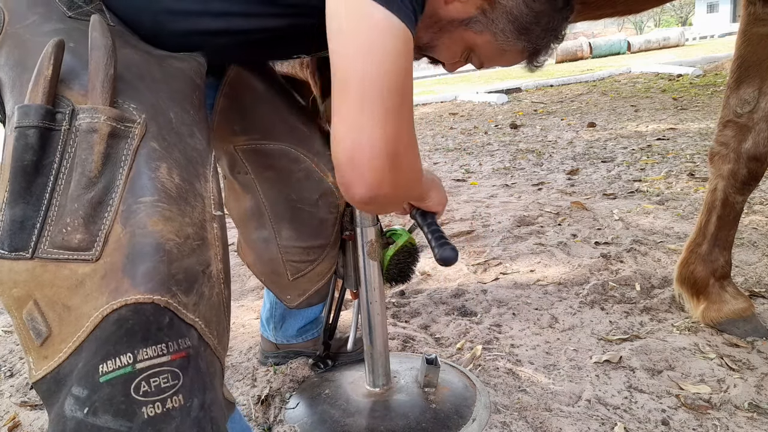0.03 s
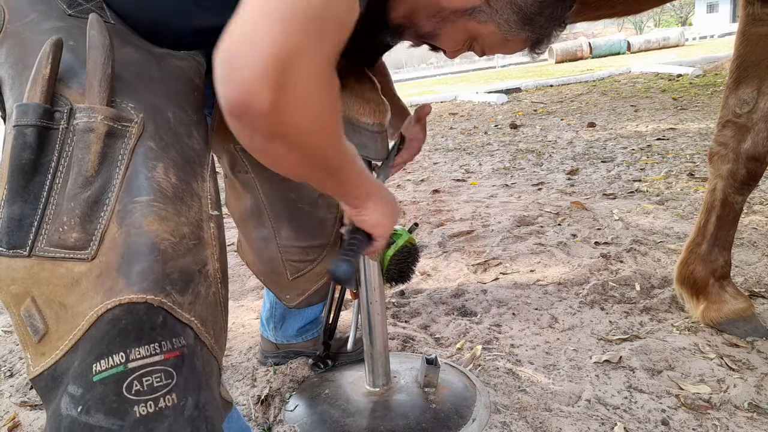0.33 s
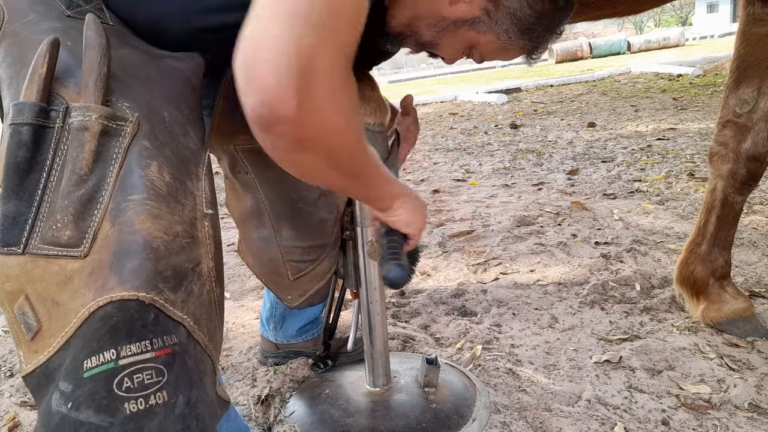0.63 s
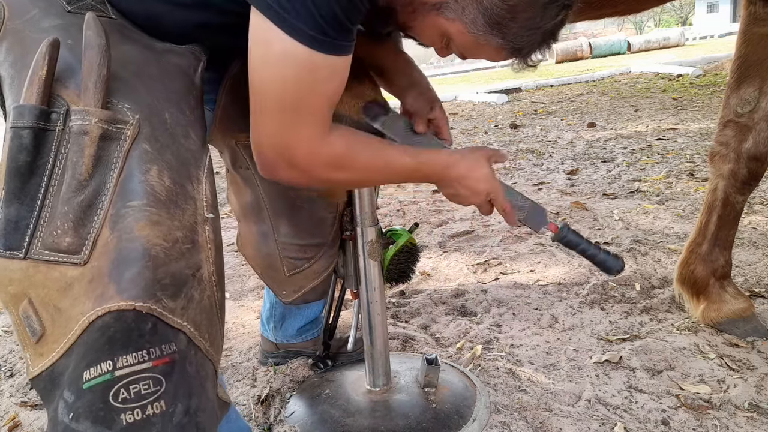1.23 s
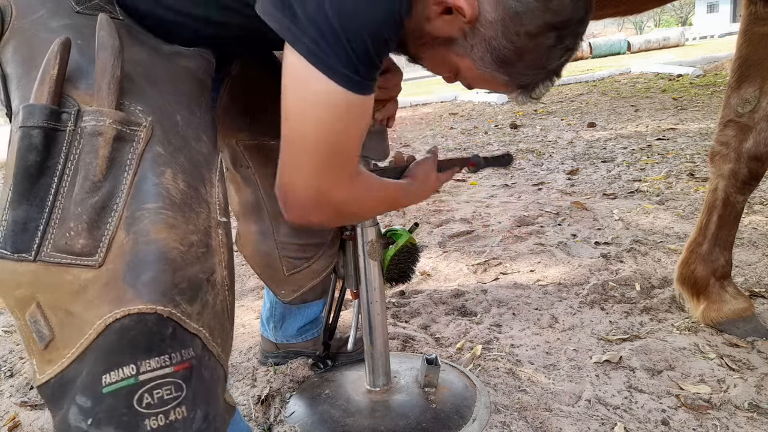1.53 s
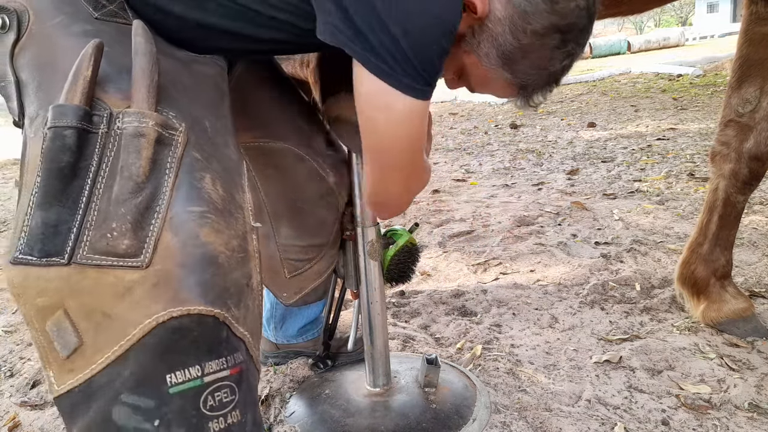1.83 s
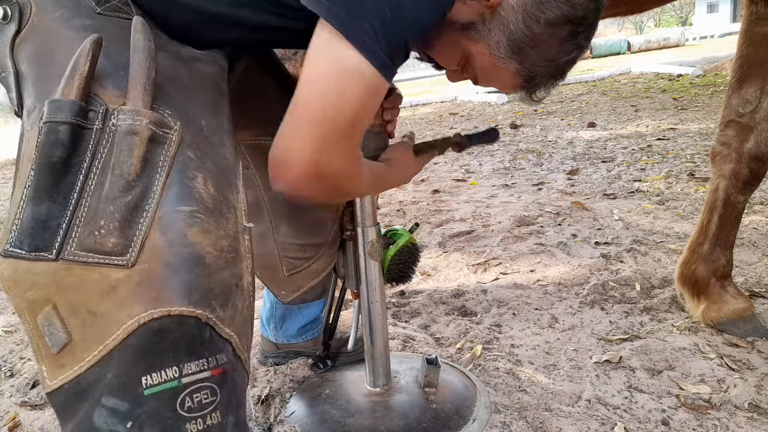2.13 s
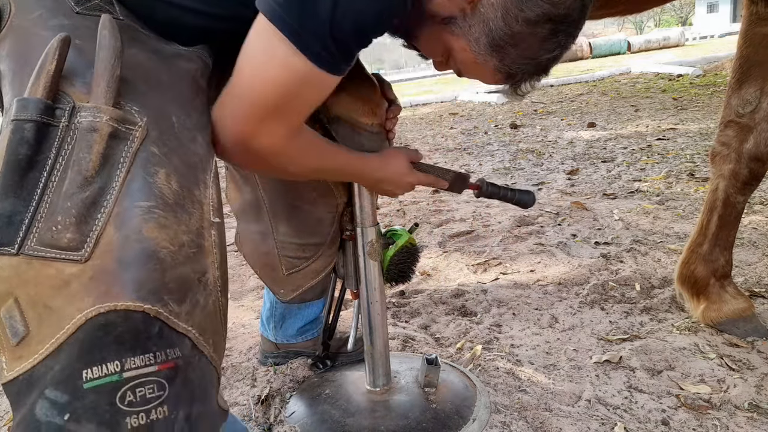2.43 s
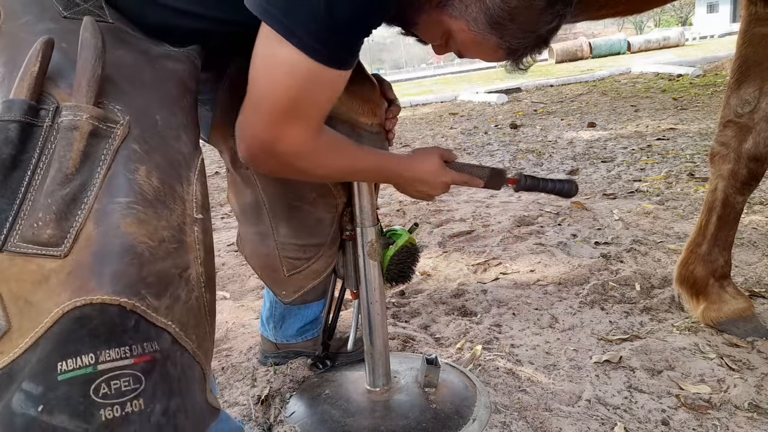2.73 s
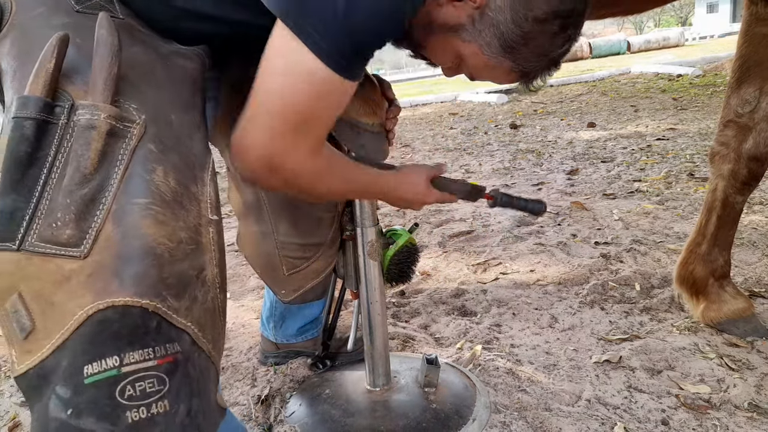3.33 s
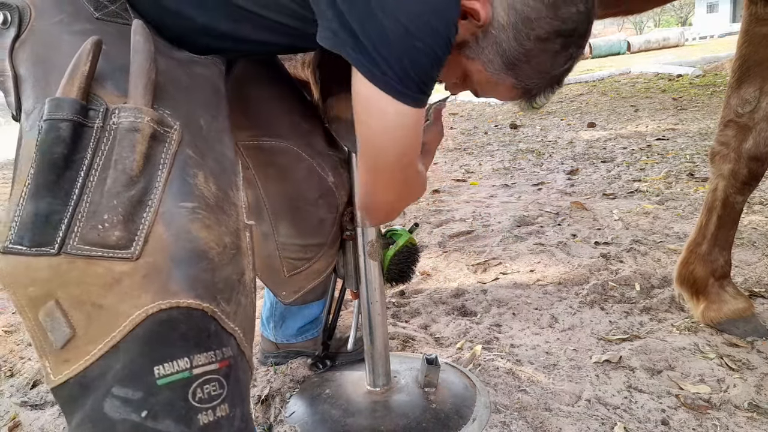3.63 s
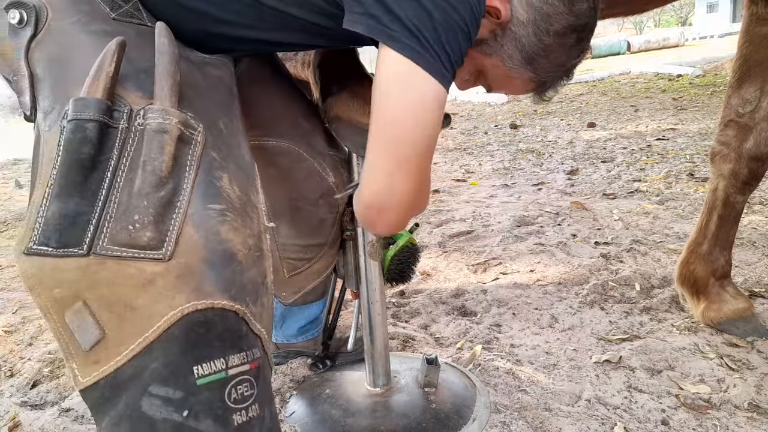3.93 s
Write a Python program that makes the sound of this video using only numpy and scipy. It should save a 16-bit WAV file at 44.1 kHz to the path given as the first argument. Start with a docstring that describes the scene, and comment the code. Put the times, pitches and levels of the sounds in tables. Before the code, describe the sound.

A rasp scrapes a horse's hoof in repeated strokes, with low thumps and light wind.

```python
"""A farrier's rasp cuts a horse's hoof outdoors, close to the microphone.
In each stroke the teeth fracture the horn, a broadband hiss, and force the steel blade and the hoof
into vibration. On hard strokes they catch and chatter; at moments they squeak or gouge deep, and
there is one dull knock. Low thumps of the hoof mix with puffs of light wind, which rumbles on the
microphone ports over a quiet yard."""
import sys
import numpy as np
from scipy import signal
from scipy.fft import rfft, irfft, next_fast_len
from scipy.io import wavfile
from scipy.ndimage import map_coordinates

SR = 44100
rng = np.random.default_rng(int(sys.argv[2]) if len(sys.argv) > 2 else 0)


def master(y):
    """Save y as 16-bit WAV."""
    cut = np.clip(np.atleast_2d(y).T, -1, 1)
    pcm = np.round(cut * 32767)  # scale
    wavfile.write(sys.argv[1], SR, pcm.astype(np.int16))


N = 176400
T = np.arange(N) / SR
GRID = next_fast_len(N + SR // 4, real=True)  # padded so that ringing does not wrap round
HZ = np.fft.rfftfreq(GRID, 1 / SR)
TOP_HZ = 15850

# Spectra of the noise sources. Each row: frequency in Hz, relative spectral density in dB.
YARD_SPECTRUM = [(100, 2.5), (400, 2), (700, -6.5), (1000, 1.5), (1900, -1), (2600, -9.5), (6000, -11),
                 (8500, -19), (9800, -11), (14000, -17), (15800, -26)]
RUMBLE_SPECTRUM = [(12, -35), (30, -12), (55, 1.5), (85, -0.5), (125, 2.5), (180, -3.5), (260, -10.5),
                   (400, -20), (700, -32.5), (1500, -72.5)]
GRIT_SPECTRUM = [(400, -30.5), (900, -0.5), (1500, 8), (2200, -4), (3200, -27.5), (8000, -35)]
CRUNCH_SPECTRUM = [(100, 18.5), (500, -1), (1600, 6), (3000, -2.5), (5000, -13.5), (8500, -41),
                   (10000, -9.5), (15800, -14.5)]
HISS_SPECTRUM = [(300, 4.5), (900, 6), (2500, -0.5), (4200, 8), (5800, 0.5), (7500, 2.5), (8500, -1),
                 (10000, 6), (12000, 2), (14000, 4.5), (15800, -14)]
DRONE_SPECTRUM = [(60, -7), (150, 2), (270, -2.5), (400, -11.5), (520, -10.5), (750, -17), (1500, -28),
                  (3000, -23), (8000, -62.5)]
# Modes of the hoof capsule, of hoof and rasp locked together, and of the steel blade.
# Each row: frequency in Hz, bandwidth in Hz, relative level in dB.
CAPSULE_MODES = [(510, 79, 4), (536, 20, -6)]
LOCKED_MODES = [(928, 53, -1), (1374, 20, 2.5), (1706, 72, 4), (2230, 55, 6), (2686, 58, 7),
                (2760, 90, 7.5), (3920, 110, -0.5), (5540, 86, -5), (6310, 107, 2), (6590, 47, -11),
                (7230, 80, -7)]
BLADE_MODES = [(1404, 17, -5), (1757, 48, 0.5), (2080, 39, -2.5), (2204, 66, 4), (2640, 71, -1),
               (2910, 53, -5), (3313, 41, 5), (3770, 100, -3.5), (4064, 37, 7.5), (5020, 120, -3.5),
               (6050, 130, -3), (7450, 140, -7), (8900, 110, -2), (10800, 140, -10.5)]
# Left-right coherence of the air and of the rasp. Each row: frequency in Hz, coherence from 0 to 1.
AIR_COHERENCE = [(50, 0.045), (600, 0.057), (8000, 0.036)]
RASP_COHERENCE = [(100, 0.6), (250, 0.26), (500, 0.98), (1200, 0.58), (2500, 0.63), (4500, 0.14),
                  (9000, 0.15), (15000, 0.23)]
# Strength of the wind. Each row: time in seconds, relative level in dB.
WIND_LEVELS = [(0.0, -47), (0.17, -43.5), (0.46, -43.5), (0.5, -39.5), (1.28, -54.5), (1.38, -43),
               (1.47, -53), (1.7, -39), (1.74, -48.5), (2.39, -36), (2.44, -48), (2.7, -38.5),
               (3.01, -43.5), (3.14, -40), (3.22, -43), (3.58, -38.5), (3.89, -49), (4.0, -38)]
# Low thumps of the hoof and puffs of wind on the microphone.
# Each row: middle in seconds, level in dB, frequency in Hz.
LOW_THUMPS = [(0.181, -24.5, 73.5), (0.262, -25, 71.4), (0.518, -20.5, 168), (0.53, -29, 232),
              (0.561, -25, 101), (0.786, -24, 100), (0.816, -26.5, 130), (1.388, -28, 125),
              (1.688, -21, 131), (1.692, -32, 266), (2.009, -24, 142.6), (2.181, -20.5, 173),
              (2.401, -25.5, 150.3), (2.631, -26, 109), (2.679, -21, 163.3), (2.714, -24, 128.6),
              (2.857, -26, 128), (3.137, -21.5, 87), (3.165, -22, 101), (3.424, -38, 135),
              (3.607, -25.5, 127.6), (3.655, -26, 160)]
# A dull knock. Each row: start in seconds, level in dB, frequency in Hz.
HOOF_KNOCKS = [(3.0123, -29, 567)]
# Squeaks of the rasp on the horn. Each row: middle in seconds, frequency in Hz, level in dB.
RASP_SQUEAKS = [(0.17, 4080, -51.5), (0.195, 5000, -54), (.21, 3300, -52.5), (.24, 4170, -50),
                (.245, 12950, -55), (0.276, 2146, -46.5), (1.15, 910, -61.5), (1.86, 4980, -60.5),
                (1.965, 4080, -48.5), (1.99, 2180, -48), (2.53, 6300, -50), (2.564, 4130, -48.5),
                (2.65, 9000, -55), (2.726, 4170, -53), (2.865, 4100, -55), (2.9, 3354, -66),
                (3.008, 4100, -51.5), (3.786, 4096, -58), (3.974, 1715, -53.5)]
# Deep bites. Each row: start in seconds, relative levels of boom and grit in dB.
DEEP_GOUGES = [(0.25, -35, -49), (.503, -42.5, -41.5), (2.669, -39, -40)]
# Teeth catching in the horn. Each row: start in seconds, relative level in dB.
TOOTH_CATCHES = [(0.252, -36.5), (0.4942, -23), (0.5007, -20.5), (0.509, -39), (0.515, -37), (0.52, -37.5),
                 (0.5257, -37.5), (0.543, -39), (0.61, -38), (0.6204, -27), (0.625, -31.5), (.628, -32),
                 (0.642, -29.5), (0.6787, -33), (0.689, -35), (0.702, -34), (0.708, -30.5), (0.72, -34.5),
                 (.731, -35.5), (0.743, -33), (0.749, -36), (1.201, -61), (1.9818, -35), (2.029, -39.5),
                 (2.275, -32.5), (2.2915, -30.5), (2.295, -34.5), (2.3117, -31.5), (2.325, -33),
                 (2.3375, -31.5), (2.342, -40), (2.3701, -40), (2.381, -33), (2.385, -41), (2.401, -43.5),
                 (2.6792, -37), (3.7673, -37.5)]
# Strokes of the rasp. Each row: start, fastest moment and end in seconds,
# relative levels of hiss, blade ring and hoof drone in dB, top tooth rate in Hz.
RASP_STROKES = [(0.079, 0.274, 0.47, -53, -53.5, -48, 340.7),
                (0.475, 0.52, 0.63, -48.5, -52.5, -37.5, 240.2),
                (0.545, 0.729, 0.79, -48, -51, -49.5, 240.3), (0.737, 0.822, 1.14, -65.5, -62, -58, 179.6),
                (1.05, 1.216, 1.26, -65.5, -70.5, -58, 200.1),
                (1.584, 1.638, 1.88, -69.5, -65.5, -54.5, 330),
                (1.795, 1.925, 2.174, -55, -52.5, -45, 369.3),
                (2.089, 2.168, 2.27, -62.5, -51.5, -50.5, 310.2),
                (2.24, 2.318, 2.53, -52.5, -53.5, -42, 289.7),
                (2.435, 2.538, 2.624, -54.5, -48.5, -40, 374.7),
                (2.613, 2.717, 2.82, -51, -51.5, -42.5, 400), (2.82, 2.868, 2.97, -59.5, -52.5, -43, 335.2),
                (2.934, 3.02, 3.243, -56, -56.5, -46.5, 259.2), (3.031, 3.079, 3.125, -57.5, -59, -52, 340),
                (3.66, 3.779, 3.97, -55, -59.5, -50, 338.6), (3.906, 3.983, 4.7, -68, -58, -58, 179.8)]


def amp(db):
    """Amplitude ratio of a level in decibels."""
    return 10 ** (np.asarray(db) / 20)


def unit(x):
    """Normalisation to an rms of 1."""
    return x / np.sqrt(np.mean(x ** 2) + 1e-20)


def along(points):
    """Interpolation of (Hz, value) points on a logarithmic frequency axis."""
    hz, values = np.transpose(points)
    return np.interp(np.log(HZ + 1), np.log(hz + 1), values)


def wobble(knots_per_s):
    """Smooth random modulation: a spline through Gaussian values."""
    return map_coordinates(rng.standard_normal(4096), [T * knots_per_s], mode="wrap")


def wave_packet(middle, length, hz, phase):
    """A pressure pulse: a sinusoid under a raised-cosine window."""
    window = np.cos(np.pi * np.clip((T - middle) / length, -.5, .5)) ** 2
    return window * np.cos(2 * np.pi * hz * (T - middle) + phase)


def burst(start, rise_s, t60_s):
    """Envelope of a transient: quick rise, then exponential decay."""
    age = np.maximum(T - start, 0)
    return amp(-60 * np.minimum(age / t60_s, 2)) * (1 - np.exp(-age / rise_s))


def filtered(x, response):
    """Linear filtering: the spectrum is multiplied by a frequency response."""
    return irfft(rfft(x, GRID) * response, GRID)[..., :N]


def colour(points):
    """Minimum-phase response of unit power through (Hz, dB) points."""
    cepstrum = irfft(np.log(amp(along(points))), GRID)
    causal = cepstrum * (1 + np.sign(np.fft.fftfreq(GRID)))
    response = np.exp(rfft(causal))
    return response / np.sqrt(np.mean(abs(response) ** 2))


def resonances(modes):
    """Superposition of damped oscillators, as a response of unit power."""
    response = sum(amp(db) * 1j * HZ * width / (hz * hz - HZ ** 2 + 1j * HZ * width)
                   for hz, width, db in modes)
    return response / np.sqrt(np.mean(abs(response) ** 2))


def ringing(force, modes, flare_db):
    """Forced vibration: each mode swells and sinks on its own as the contact point slides."""
    coupling = amp(flare_db * np.array([wobble(28) for _ in modes]))
    drive = rfft(force * coupling[:, None], GRID)
    weights = np.array([amp(db) * np.sqrt(width) for _, width, db in modes])
    weights /= np.linalg.norm(weights)
    responses = np.array([weight * resonances([mode]) for weight, mode in zip(weights, modes)])
    return irfft((drive * responses[:, None]).sum(0), GRID)[:, :N]


def stereo(pair, coherence):
    """Partial coherence: left and right are the sum and difference of two weighted signals."""
    angle = np.arccos(np.clip(along(coherence), -1, 1)) / 2
    mid, side = filtered(pair, np.array([np.cos(angle), np.sin(angle)]))
    return np.array([mid + side, mid - side])


def yard():
    """A diffuse field: faint, steady outdoor noise, almost incoherent between left and right."""
    air = filtered(rng.standard_normal((2, N)), colour(YARD_SPECTRUM))
    return amp(-63.5) * stereo(air, AIR_COHERENCE)


def wind():
    """Turbulent pressure at the microphone: a lumpy rumble, different at the two ports."""
    level = amp(np.interp(T, *np.transpose(WIND_LEVELS)) + 3.5)
    eddies = unit(amp(3.5 * wobble(45)) * rng.standard_normal((2, N)))
    return stereo(filtered(level * eddies, colour(RUMBLE_SPECTRUM)), AIR_COHERENCE)


def low_thumps(cycles=1.59, port_spread_rad=0.82):
    """Low pressure pulses: thumps of the hoof and puffs of wind, differing in phase at each port."""
    pressure = np.zeros((2, N))
    for middle, db, hz in LOW_THUMPS:
        phase = rng.uniform(0, 2 * np.pi) + port_spread_rad * rng.standard_normal((2, 1))
        pressure += amp(db) * wave_packet(middle, cycles / hz, hz, phase)
    return pressure


def knocks(length_s=0.0069):
    """A heavily damped impact, as of the hoof shifting on its stand."""
    return sum(amp(db) * wave_packet(start + length_s / 2, length_s, hz, rng.uniform(0, 2 * np.pi))
               for start, db, hz in HOOF_KNOCKS)


def squeaks(length_s=0.057, jitter_hz=105):
    """Frictional oscillation: brief tones roughened by random frequency modulation."""
    tones = np.zeros((2, N))
    for middle, hz, db in RASP_SQUEAKS:
        phase = 2 * np.pi * np.cumsum(hz + jitter_hz * wobble(500)) / SR
        envelope = amp(db) * wave_packet(middle, length_s, hz=0, phase=0)
        tones += envelope * np.sin([phase, phase + rng.uniform(0, 2 * np.pi)])
    return tones


def fractures(per_s=9000, size_spread=0.35):
    """Shot noise: dense tiny fractures of horn, uneven in size."""
    hits = rng.random((2, N)) < per_s / SR
    impulses = hits * rng.standard_normal((2, N))
    return unit(impulses * np.exp(size_spread * rng.standard_normal((2, N))))


def gouges():
    """Resonance of the hollow hoof capsule: a deep bite gives a boom along with coarse grit."""
    boom_level, grit_level = sum(amp([[boom_db], [grit_db]]) * burst(start, rise_s=0.012, t60_s=0.19)
                                 for start, boom_db, grit_db in DEEP_GOUGES)
    boom = filtered(boom_level * fractures(), resonances(CAPSULE_MODES))
    grit = filtered(grit_level * fractures(), colour(GRIT_SPECTRUM))
    return boom + grit


def catches(rise_s=0.00074, t60_s=0.023, tear_db=-2.5, snap_db=8.5):
    """Stick-slip: a caught tooth tears the horn, snaps free and rings hoof and rasp together."""
    envelope = sum(amp(db + tear_db) * burst(start, rise_s, t60_s) for start, db in TOOTH_CATCHES)
    tear, crunch = envelope * rng.standard_normal((2, 2, N))
    snaps = np.zeros((2, N))
    for start, db in TOOTH_CATCHES:
        snaps[:, round((start + rise_s) * SR)] += amp(db + snap_db)
    ring = ringing(tear + snaps, LOCKED_MODES, flare_db=1.5)
    return ring + filtered(crunch, colour(CRUNCH_SPECTRUM))


def moving_contact(scrape):
    """Time-varying filtering: the scrape's colour shifts as the contact moves, less in the high treble."""
    hz, _, spectra = signal.stft(scrape, SR, nperseg=512)
    patch = np.outer(np.hanning(7), np.hanning(13))  # frequency bins by time frames
    field = unit(signal.fftconvolve(rng.standard_normal(spectra.shape[1:]), patch, "same"))
    depth_db = 2 / np.sqrt(1 + (hz[:, None] / 7400) ** 2)
    _, shifted = signal.istft(spectra * amp(depth_db * field), nperseg=512)
    return unit(shifted[:, :N])


def tooth_rows(rate_hz, jitter=0.00684, rolloff_db=0.26):
    """Periodic forcing: rows of teeth cross the hoof's edge, a buzz of 24 gliding harmonics."""
    phase = 2 * np.pi * np.cumsum(rate_hz * (1 + jitter * wobble(300))) / SR
    return unit(sum(amp(-rolloff_db * k) * np.sin(k * phase + rng.uniform(0, 2 * np.pi, (2, 1)))
                    for k in range(1, 25)))


def bites(per_s=85, decay_s=0.002, depth=1.4):
    """Amplitude modulation: the gain jumps and relaxes as teeth dig in at random times and strengths."""
    kicks = (rng.random(N) < per_s / SR) * rng.random(N)
    load = signal.lfilter([1], [1, -np.exp(-1 / (decay_s * SR))], kicks)
    return unit(1 + depth * load)


def strokes(swell_power=0.87, fade_power=3.42):
    """Abrasion: horn hiss, blade ring, hoof drone and tooth rate follow powers of the rasp's speed."""
    levels, tooth_hz = np.zeros((3, N)), np.zeros(N)
    for start, fastest, end, hiss_db, ring_db, drone_db, top_hz in RASP_STROKES:
        progress = np.interp(T, [start, fastest, end], [0, .5, 1])
        speed = np.abs(np.sin(np.pi * progress))
        envelope = speed ** np.where(T < fastest, swell_power, fade_power)
        levels += amp([[hiss_db], [ring_db], [drone_db]]) * envelope
        tooth_hz = np.maximum(tooth_hz, top_hz * np.sqrt(speed))
    bite = bites()
    hiss_level, ring_level, drone_level = levels * np.array([np.sqrt(bite), bite, bite])
    teeth = amp(-6.5) * tooth_rows(tooth_hz)
    horn_force = unit(moving_contact(fractures()) + .5 * teeth)
    hiss = filtered(hiss_level * horn_force, colour(HISS_SPECTRUM))
    blade_force = unit(fractures() + teeth)
    ring = amp(-6.5) * ringing(ring_level * blade_force, BLADE_MODES, flare_db=4.5)
    flutter = amp(2 * wobble(70))
    hoof_force = unit(flutter * (moving_contact(fractures()) + .5 * teeth))
    drone = filtered(drone_level * hoof_force, colour(DRONE_SPECTRUM))
    return hiss + ring + drone


def scene():
    """Superposition in open air: time and level differences place the rasp just left of centre."""
    sides = np.array([[1], [-1]])
    left_lead_s, tilt_db = 0.00004, 0.5
    placement = np.exp(1j * np.pi * HZ * left_lead_s * sides) * amp(sides * tilt_db * HZ / TOP_HZ)
    rasp = stereo(strokes() + squeaks() + gouges() + catches(), RASP_COHERENCE)
    return filtered(rasp, placement) + knocks() + wind() + low_thumps() + yard()


def record(dry):
    """Band limiting: an ideal low-pass filter removes everything above TOP_HZ."""
    return filtered(dry, HZ < TOP_HZ)


dry = scene()
out = record(dry)
master(out)
```